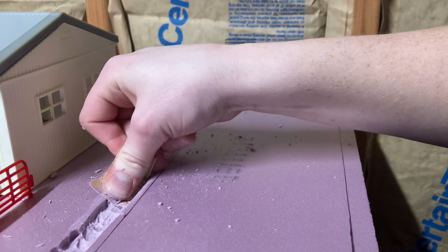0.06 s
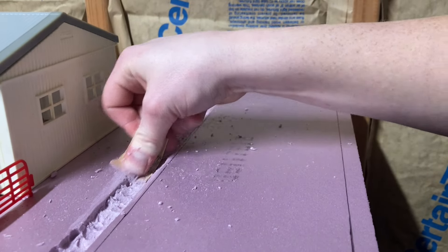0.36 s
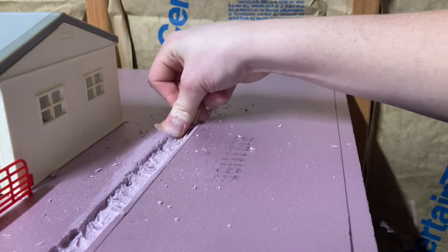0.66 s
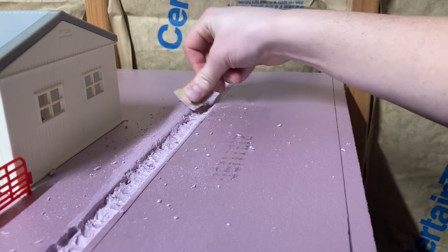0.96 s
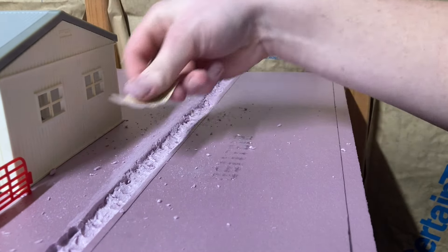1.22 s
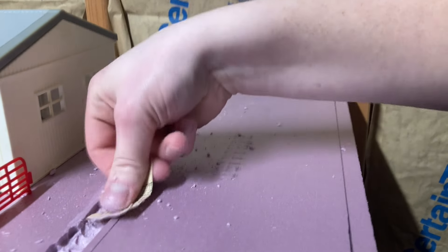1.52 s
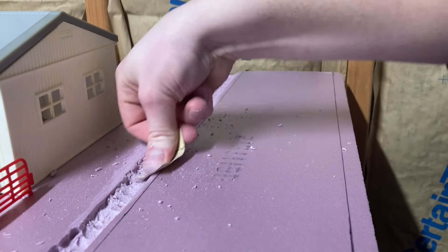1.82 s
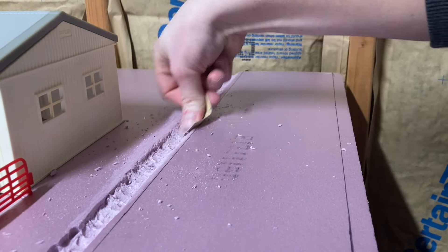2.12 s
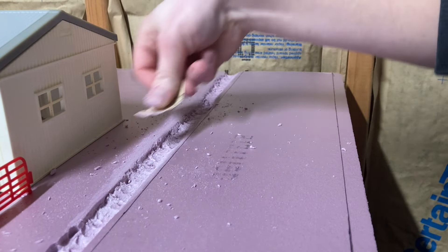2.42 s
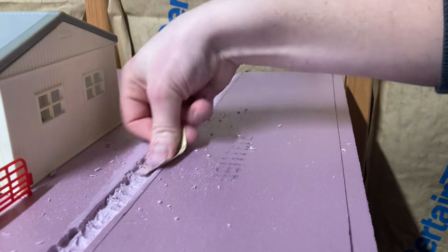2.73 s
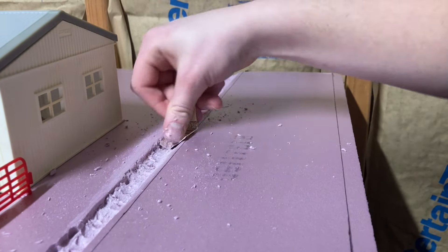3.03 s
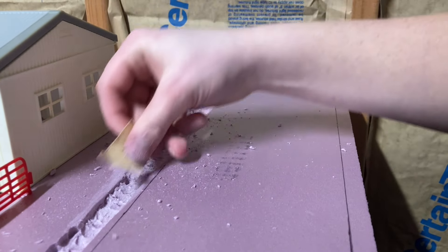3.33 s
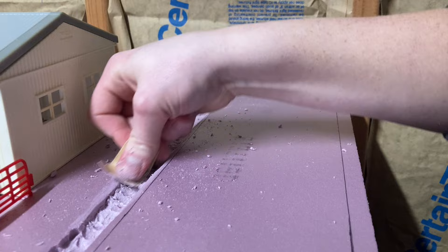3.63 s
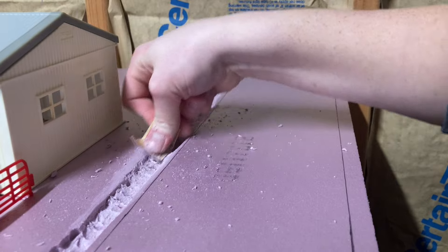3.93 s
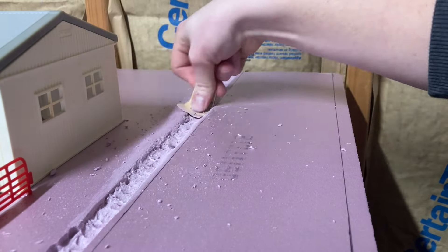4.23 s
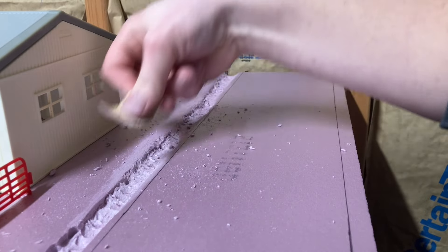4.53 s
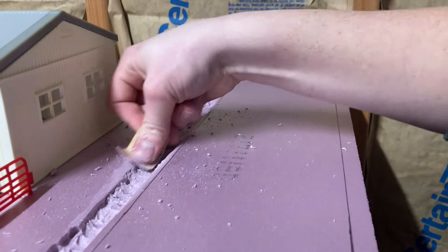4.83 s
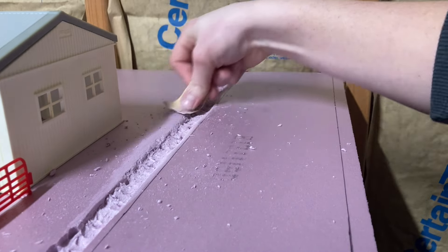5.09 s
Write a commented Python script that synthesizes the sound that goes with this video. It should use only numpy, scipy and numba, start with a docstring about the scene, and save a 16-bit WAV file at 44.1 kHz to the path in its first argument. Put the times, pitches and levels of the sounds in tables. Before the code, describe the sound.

Sandpaper is rubbed by hand along the cut edge of a foam board, close to the microphone in a small room. Each stroke is a short, dry, bright hiss with a papery rasp and a faint hollow ring from the board. Three quick strokes come between 0.1 and 0.8 seconds, with a sharp paper click at 0.5. After a pause, the hand lands with a soft knock near 1.5 seconds and three more strokes run until 2.2, ending in a click. Another soft knock at 2.6 leads into a single stroke, followed by a light scuff and two small clicks around 3 seconds. A light tap at 3.4 precedes three strokes from 3.6 to 4.2. After a short gap, a soft knock at 4.6 starts two joined strokes lasting until about 5 seconds. Very faint room tone and low hum fill the pauses.

```python
"""Sandpaper rubbed by hand along the cut edge of a foam board, close to a stereo microphone in a small room.
Grit tears the foam cells in a dense hiss; the same scraping rings the paper and drums the light board. The hand
lands with a soft knock before a run of strokes; the paper's edge flicks as it bites or lets go, and a fingertip
slides once with a light squeak. At this distance the walls answer faintly, over low room tone and mains hum."""
import sys
import numpy as np
from scipy import signal
from scipy.fft import rfft, irfft, next_fast_len
from scipy.io import wavfile
from scipy.ndimage import map_coordinates
from numba import njit

SR = 44100
rng = np.random.default_rng(int(sys.argv[2]) if len(sys.argv) > 2 else 0)


def digitize_waveform(pressure):
    """Quantize a signal to 16-bit integers and store it at the path in sys.argv[1].

    Rows of a 2-D input are taken as channels; values are limited to [-1, 1].
    """
    field = np.atleast_2d(pressure).T
    bounded = np.clip(field, -1, 1)
    quanta = np.round(bounded * 32767).astype(np.int16)
    wavfile.write(sys.argv[1], SR, quanta)


N = 227493
TIME = np.arange(N) / SR
FFT_SIZE = next_fast_len(N + SR)
HZ = np.arange(FFT_SIZE // 2 + 1) * SR / FFT_SIZE

# Strokes of the hand, firm and light. Each row: start, end, attack and release in seconds; hiss level,
# its swell from start to end and its arch at mid-stroke in dB; paper rasp, paper note, board ring, board
# note and rumble in dB relative to the hiss; sheet pitch, paper note and board note in Hz; the board
# note's glide in octaves a second; the board's hollow note in Hz.
STROKES = [ (-0.016, 0.254, 0.015, 0.033, -55.5, -2.5, 1.7, -9, -23, -8, -31, -1, 9190, 2996, 606, 2.5, 227.3),
           (0.105, 0.198, 0.019, 0.015, -27.5, 4.5, 2, -2.5, -8.5, -12.5, -17, -8, 9200, 3250, 1470, 0, 215),
           (0.353, 0.529, 0.015, 0.012, -21.5, -4, 3, -10, -34, -17, -34, -17.5, 14530, 3656, 644, -4.5, 210),
           (0.531, 0.619, 0.012, 0.011, -50, -2.5, 0.6, -5, -13, -17, -12, -2, 9580, 2920, 568, 2.5, 289.7),
           (0.656, 0.791, 0.015, 0.023, -24, 3.5, 2.5, -4, -13, -15, -23, -19.5, 10680, 3200, 596.4, 7.5, 149.7),
           (0.844, 0.923, 0.0088, 0.0091, -47.5, -0.5, 5.5, -9, -20, -9.5, -27, -11, 8000, 2846, 584, -4.5, 326),
           (1.05, 1.243, 0.015, 0.0036, -65, -0.5, 1.2, -22.5, -29.5, -24, -29, -17, 10320, 2774, 611.5, 1.5, 324.7),
           (1.524, 1.648, 0.018, 0.13, -25, 1, 2, -8.5, -13, -19, -46, -19.5, 8270, 2800, 690, -1, 265.3),
           (1.768, 2.029, 0.086, 0.0099, -25.5, -1, 1, -6.5, -16, -15.5, -15, -17, 10850, 2750, 675, 0, 311),
           (2.048, 2.205, 0.015, 0.016, -25, -1, 0.5, -10, -27, -17.5, -19, -23, 10360, 2780, 649, 0, 345),
           (2.638, 2.884, 0.0049, 0.013, -25.5, 4.5, 3, -11, -16, -19, -23.5, -20, 10030, 2950, 672, 0.5, 372.6),
           (2.902, 3.077, 0.014, 0.015, -49.5, 4.5, -2.1, -3, -24, -10.5, -22, -3.5, 13000, 2720, 666, 2, 352),
           (3.189, 3.264, 0.014, 0.0073, -50, 1, 3, -21, -30, -36, -42.5, -34, 12970, 2913, 612, 1.5, 287.7),
           (3.428, 3.553, 0.0084, 0.052, -44.5, -1, 4.2, -4.5, -9, -14.5, -19, -7.5, 12000, 3040, 733, -4.5, 237.4),
           (3.572, 3.725, 0.013, 0.022, -28, 5, 4.5, -4.5, -12.5, -18.5, -13, -11, 12440, 2930, 703, -1, 274),
           (3.863, 3.985, 0.02, 0.042, -25.5, 2, 0.5, -4.5, -19.5, -14.5, -13.5, -12, 12500, 2650, 694, -3.5, 280),
           (4.032, 4.158, 0.032, 0.021, -22, 1.5, 3, -3.5, -12.5, -17, -21.5, -45, 7330, 2750, 593, -1.5, 226),
           (4.686, 4.966, 0.0039, 0.006, -31, 3, 3.5, -4.5, -12.5, -14.5, -16, -12, 12100, 2850, 699.6, -0.5, 350),
           (4.932, 5.033, 0.038, 0.022, -22.5, 1.5, -0.5, -3, -9, -15.5, -22, -24.5, 8860, 2720, 683.5, -1, 369.3),
           ]
# The hand landing on the board. Each row: start in seconds, tick level in dB, tick decay in seconds,
# levels of tap, thump and foam crush in dB, thump delay in seconds.
LANDINGS = [(1.4656, -43.5, 0.013, -44.5, -36.5, -44, 0.022),
            (2.5908, -48.5, 0.022, -39.5, -34.5, -48.5, 0.024), (3.392, -39, .008, -55, -43.5, -53, 0.017),
            (4.643, -46.5, 0.029, -45.5, -38, -48.5, 0.024)]
# The paper's edge catching, and a light patter of the hand landing near 2.6 s. Each row: start in seconds, #
# rustle level in dB, decay in seconds, pitch in Hz, level of the board's knock in dB.
FLICKS = [ (.321, -42, .018, 2800, -46), (.5157, -10.5, .0009, 8500, -33), (.878, -44, .005, 7000, -56),
          (.8895, -42, .003, 8000, -58), (.8993, -31, .0012, 6000, -49), (1.093, -48.5, .0005, 5500, -77),
          (1.509, -50.5, .018, 2400, -55), (2.163, -18, .003, 11000, -44), (2.1655, -15, .0015, 11000, -40),
          (2.449, -67, .003, 3500, -80), (2.509, -53.5, .003, 12000, -80), (2.597, -38, .0015, 12000, -58),
          (2.605, -41, .002, 10000, -58), (3.0365, -26, .0015, 7500, -42),
          (3.0695, -25.5, .0022, 9000, -40), (3.455, -42, .004, 10000, -58), (4.245, -48, .003, 10000, -58),
          (4.59, -58, .002, 12000, -80), ]
# Bending modes of the board. Each row: frequency in Hz, width in Hz, level in dB.
BOARD_MODES = [(210, 160, -20), (345, 61, -5.5), (554, 28, -1), (690, 44, 0), (797, 120, -1),
               (1000, 80, -4.5), (1257, 220, -8), (1500, 220, -3), (1898, 270, -5)]
# Spectra of the sources. Each row: frequency in Hz, level in dB.
GRIT_SPECTRUM = [(2500, -35), (5000, -13), (7000, -4), (8800, 0), (11200, 0), (13500, -1.5), (16000, -3.5)]  # foam cells tearing
RASP_SPECTRUM = [(700, -30), (1200, -13), (2050, -9), (2600, -4), (3500, -2), (4500, -1.5), (6200, -1),
                 (7500, -4.5), (11000, -22)]  # the held paper
RUMBLE_SPECTRUM = [(20, -21), (50, -8), (80, -9), (125, -4), (160, -4.5), (205, 1), (260, -4.5), (335, -1),
                   (420, -10), (800, -23)]  # the drummed board
TICK_SPECTRUM = [(200, -0.5), (1200, -19.5), (3000, -14.5), (7000, -20), (11000, -11.5), (16000, -13.5)]  # paper touching down
CRUSH_SPECTRUM = [(40, -8.5), (130, 2), (370, -2), (520, -27.5), (1000, -14.5), (3000, -42)]  # foam giving under the fingers
AIR_SPECTRUM = [(20, -10), (50, 7.5), (130, -4), (200, -15), (400, -18), (800, -26), (2500, -33),
                (8000, -35.5), (16000, -35)]  # the quiet room
# Mains hum in the room. Each row: frequency in Hz, rms level in dB.
MAINS_HUM = [(60, -81), (120, -73), (240, -86.5)]
# Phase between left and right channels, rising in steps through the treble; it spreads the hiss # between the
# channels. Each row: frequency in Hz, phase in radians.
STEREO_PHASE = [(0, 0), (400, 0), (780, 2.3), (1100, .6), (1550, 1.2), (2200, 0), (3300, -1.4),
                (4400, -1.7), (5250, -3.1), (6800, -3.1), (7580, -0.2), (8350, 0.0), (9220, 2.8),
                (10200, 3.6), (11000, 6.2), (11900, 6.5), (12700, 9.5), (13400, 9.6), (14300, 12.2),
                (16400, 14.4)]
# Sound scattered by hand and board. Each row: frequency in Hz, level in dB relative to the direct sound.
SCATTER_SPECTRUM = [(100, -17), (300, -11), (500, -2), (690, -7), (1100, 4), (1600, 2), (2200, -6),
                    (3000, -4), (4700, 0), (5700, -20), (7200, -6), (8200, -14), (15000, -14)]


def sanding():
    """A faster hand tears more cells; their clicks sound directly, through the paper and the board."""
    levels_db, (sheet_hz, paper_hz, board_hz, hollow_hz) = strokes()
    hiss_db = levels_db[0]
    speed = undb((hiss_db - hiss_db.max()) / 2)
    tears_per_s = 3500 + 22000 * speed
    # the sheet sticks and slips on the ragged edge, so the scraping flutters and wavers
    drag = undb(.4 * walk(rate=80) + .5 * walk(rate=14))
    coarse = undb(-12.5) * fractures(rate=60, spread_db=1)  # a coarse grain rips a bigger cell
    hiss = grit_hiss(tears_per_s, coarse, sheet_hz)
    paper = paper_layers(tears_per_s, coarse, paper_hz)
    board = board_layers(tears_per_s, board_hz, hollow_hz)
    return drag * np.sum(undb(levels_db) * np.array([hiss, *paper, *board]), axis=0)


def strokes():
    """Six layer levels in dB and four pitches in Hz; where strokes overlap, the louder leads the pitch."""
    power, pitch = 1e-14, 0
    for (start, end, attack, release, hiss_db, swell_db, arch_db,
         rasp_db, paper_note_db, ring_db, board_note_db, rumble_db,
         sheet_hz, paper_hz, board_hz, glide, hollow_hz) in STROKES:
        speed = hand_speed(start, end, attack, release, arch_db)
        from_middle_s = np.clip(TIME, start, end) - (start + end) / 2
        travel = from_middle_s / (end - start)
        pressure = undb(-.5 * travel)  # the board fades a little as the hand's pressure changes
        # paper and board grow more slowly with speed than the hiss
        paper, board, rumble = speed ** .95, pressure * speed ** .8, pressure * speed ** .5
        balance = undb([0, rasp_db, paper_note_db, ring_db, board_note_db, rumble_db])[:, None]
        envelopes = np.array([speed, paper, paper, board, board, rumble])
        gains = undb(hiss_db + swell_db * travel) * balance * envelopes
        board_hz = board_hz * 2 ** (glide * from_middle_s)
        hollow_hz = hollow_hz * 2 ** (1.4 * from_middle_s)  # rises as the hand travels
        notes = np.array(np.broadcast_arrays(sheet_hz, paper_hz, board_hz, hollow_hz))
        power = power + gains ** 2
        pitch = pitch + (notes - pitch) * (gains[0] ** 2 + 1e-14) / power[0]
    return 10 * np.log10(power), pitch


def hand_speed(start, end, attack, release, arch_db):
    """One stroke: the paper breaks loose, slides and slows to rest; full speed is about 1."""
    rise = .5 + .5 * np.tanh((TIME - start) / (2 * attack))
    fall = .5 - .5 * np.tanh((TIME - end) / (2 * release))
    position = np.clip((2 * TIME - start - end) / (end - start), -1, 1)
    sliding = np.maximum(rise - .035, 0)  # the grit holds back a small share of the push
    return sliding * fall * undb(-arch_db * position ** 2)


def fractures(rate, spread_db):
    """Tiny, unequal clicks of foam cells tearing on the grit, about rate a second."""
    struck = rng.random(N) < rate / SR
    polarity = rng.choice([-1, 1], N)
    size = undb(spread_db * np.clip(rng.standard_normal(N), -3, 3))
    return unit(struck * polarity * size)


def grit_hiss(rate, coarse, sheet_hz):
    """Tearing cells hiss; the patch of paper under the fingers lifts a broad, shifting band."""
    tears = flutter(through(fractures(rate, spread_db=4.8) + coarse, shape(GRIT_SPECTRUM)))
    centre_hz = sheet_hz * (1 + .04 * walk(rate=25))
    return unit(tears + .7 * moving_band(tears, centre_hz, width_hz=1700.))


def flutter(x, count=9, band_hz=2000, depth_db=1.6):
    """Each band swells and sinks on its own as different grains take the load."""
    bands = (np.interp(HZ / band_hz, np.arange(count), share) for share in np.eye(count))
    return sum(undb(depth_db * walk(rate=55)) * through(x, band) for band in bands)


def paper_layers(rate, coarse, paper_hz):
    """The held paper rasps broadly and has one note, which changes with the grip and wanders."""
    rasp = unit(through(fractures(rate, spread_db=2.5) + coarse, shape(RASP_SPECTRUM)))
    paper_note = note(fractures(rate, spread_db=3), paper_hz * (1 + .025 * walk(rate=7)), width_hz=620.)
    return rasp, paper_note


def board_layers(rate, board_hz, hollow_hz):
    """The board rings and rumbles; its favoured note and hollow note depend on where the hand presses."""
    ring = unit(through(fractures(rate, spread_db=2.5), resonances(BOARD_MODES)))
    board_note = note(fractures(rate, spread_db=3), board_hz * (1 + .02 * walk(rate=6)), width_hz=140.)
    drumming = through(fractures(rate, spread_db=1), shape(RUMBLE_SPECTRUM))
    rumble = unit(drumming + .65 * moving_band(drumming, hollow_hz, width_hz=31.))
    return ring, board_note, rumble


def flicks():
    """The paper's edge snaps, or the landing hand patters: a sharp crack, a dying rustle and a knock from the
    board."""
    noise, out = rng.standard_normal(N), 0
    for start, rustle_db, decay, hz, knock_db in FLICKS:
        band = resonances([(hz, 1.1 * hz, 0)])
        crack = undb(2.5) * click(start, band)
        rustle = burst(start, decay) * unit(through(noise, band))
        out = out + undb(rustle_db) * (crack + rustle) + undb(knock_db) * knock(start, decay)
    return out


def knock(start, decay, corner_hz=450):
    """A soft push bends the board gently, so its low modes ring most; peak 1."""
    ring = through(burst(start, decay), resonances(BOARD_MODES) / (1 + 1j * HZ / corner_hz))
    return ring / np.abs(ring).max()


def landings():
    """A tick of paper and a tap on the board, then a padded thump as the fingers crush the foam a little."""
    out = 0
    tick = unit(through(rng.standard_normal(N), shape(TICK_SPECTRUM)))
    crush = unit(through(rng.standard_normal(N), shape(CRUSH_SPECTRUM)))
    for start, tick_db, tick_decay, tap_db, thump_db, crush_db, delay in LANDINGS:
        landed = TIME >= start
        thump_hz = 42 + 300 * burst(start, decay=.011)
        swell = np.exp(-((TIME - start - delay) / .0064) ** 2)
        thump = swell * np.sin(2 * np.pi * np.cumsum(thump_hz * landed) / SR)
        out = out + undb(tick_db) * tick * burst(start, tick_decay) + undb(tap_db) * tap(start)
        out = out + undb(thump_db) * thump + undb(crush_db) * crush * np.sqrt(swell) * landed
    return out


def tap(start, delay_at_1khz_s=.0014):
    """A light touch sends a bending wave through the board: treble first, bass later."""
    dispersion = np.exp(-4j * np.pi * delay_at_1khz_s * np.sqrt(1000 * HZ))
    return click(start, dispersion * resonances([(350, 400, 0)]))


def skid(middle_s=3.012, half_length_s=.024, sag_octaves_per_s=14):
    """A fingertip slides once across the paper with a light squeak whose pitch sinks as it slows."""
    since = TIME - middle_s
    hz = 2130 * 2 ** (-sag_octaves_per_s * np.clip(since, -2 * half_length_s, 2 * half_length_s))
    scuff = note(fractures(rate=3000, spread_db=5), hz, width_hz=2400.)
    return undb(-44.5) * np.exp(-(since / half_length_s) ** 2) * scuff


def close_stereo(x):
    """The direct sound, spread in phase across left and right, with scatter off hand, board and walls."""
    # the bass stays in step in both channels
    phase = np.interp(HZ, *np.transpose(STEREO_PHASE)) * HZ ** 4 / (HZ ** 4 + 200. ** 4)
    direct = np.exp(.5j * np.array([[1], [-1]]) * phase)
    walls = undb(-25) * wall_echoes(t60_s=.21, delay_s=.0051)
    scatter = shape(SCATTER_SPECTRUM)
    total = np.sqrt(1 + scatter ** 2)
    near = np.array([near_reflections(x) for channel in range(2)])
    return through(x, (direct + walls) / total) + through(near, scatter / total)


def near_reflections(x, count=4):
    """Short paths off hand and board keep changing, so the colour at the microphone shifts."""
    delays_s = np.linspace(.0012, .0044, count)
    paths = (rng.choice([-1, 1]) * delayed(x, s * (1 + .1273 * walk(rate=2.5))) for s in delays_s)
    return sum(paths) / np.sqrt(count)


def wall_echoes(t60_s, delay_s):
    """Left and right frequency responses of the small room's dying reflections, with unit power."""
    tail = rng.standard_normal((2, N)) * burst(delay_s, t60_s / np.log(1000))
    return rfft(tail / np.sqrt(np.sum(tail ** 2, axis=1, keepdims=True)), FFT_SIZE)


def room_tone():
    """A faint low murmur of air with mains hum, nearly alike on both sides of the microphone."""
    air = through(rng.standard_normal(N) + .4 * rng.standard_normal((2, N)), shape(AIR_SPECTRUM))
    hum = sum(undb(db) * np.sqrt(2) * np.sin(2 * np.pi * (hz * TIME + rng.random()))
              for hz, db in MAINS_HUM)
    return undb(-69) * unit(air) + hum


def undb(db):
    """Decibels to gain."""
    return 10 ** (np.asarray(db) / 20)


def unit(x):
    """Scale to rms 1."""
    return x / np.sqrt(np.mean(x ** 2))


def shape(points):
    """Frequency response through (Hz, dB) points."""
    hz, db = np.transpose(points)
    return undb(np.interp(np.log(HZ + 1), np.log(hz), db))


def through(x, response):
    """Pass a sound through a frequency response."""
    return irfft(rfft(x, FFT_SIZE) * response, FFT_SIZE)[..., :N]


def resonances(modes):
    """Frequency response of damped modes of alternating sign."""
    return sum((-1) ** k * undb(db) * 1j * HZ * width / (hz ** 2 - HZ ** 2 + 1j * HZ * width)
               for k, (hz, width, db) in enumerate(modes))


def walk(rate):
    """Smooth random drift at rms 1, changing about rate times a second."""
    return unit(through(rng.standard_normal(N), 1 / (1 + (HZ / rate) ** 4)))


def burst(start, decay):
    """Envelope that jumps up and dies away; decay is its time constant in seconds."""
    return (TIME >= start) * np.exp(-np.abs(TIME - start) / decay)


def click(start, response):
    """One impulse through a frequency response, at peak 1."""
    wave = through(np.arange(N) == int(start * SR), response)
    return wave / np.abs(wave).max()


@njit
def moving_band(x, hz, width_hz):
    """State-variable band-pass whose centre moves."""
    out, band_state, low_state = np.empty(len(x)), 0., 0.
    for i in range(len(x)):
        tuning, damping = np.tan(np.pi * hz[i] / SR), width_hz / hz[i]
        band = (band_state + tuning * (x[i] - low_state)) / (1 + tuning * (tuning + damping))
        band_state, low_state = 2 * band - band_state, low_state + 2 * tuning * band
        out[i] = damping * band
    return out


def note(x, hz, width_hz):
    """A steep resonance with a moving centre, at rms 1."""
    return unit(moving_band(moving_band(x, hz, width_hz), hz, width_hz))


def delayed(x, seconds):
    """The sound heard after a delay that may change."""
    return map_coordinates(x, [(TIME - seconds) * SR], order=3)


def scene():
    """Sanding, landings, flicks and a skid close to the microphone, with the quiet room behind."""
    return close_stereo(sanding() + landings() + flicks() + skid()) + room_tone()


def record(dry):
    """The recorder cuts the top steeply above 15.7 kHz."""
    return signal.sosfilt(signal.ellip(10, .2, 80, 15700, fs=SR, output="sos"), dry)


dry = scene()
out = record(dry)
digitize_waveform(out)
```